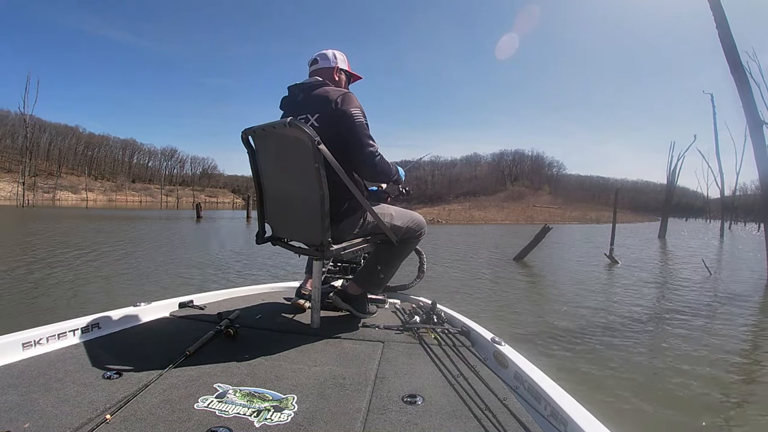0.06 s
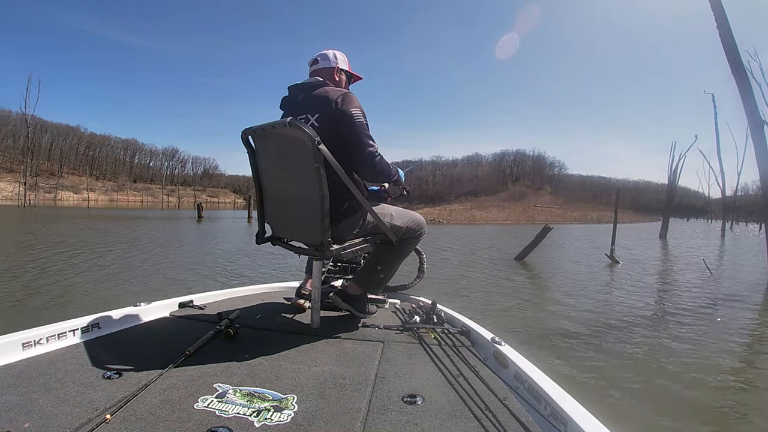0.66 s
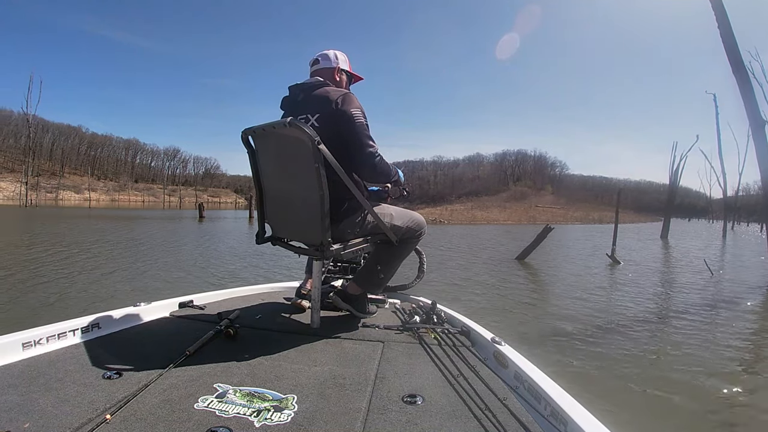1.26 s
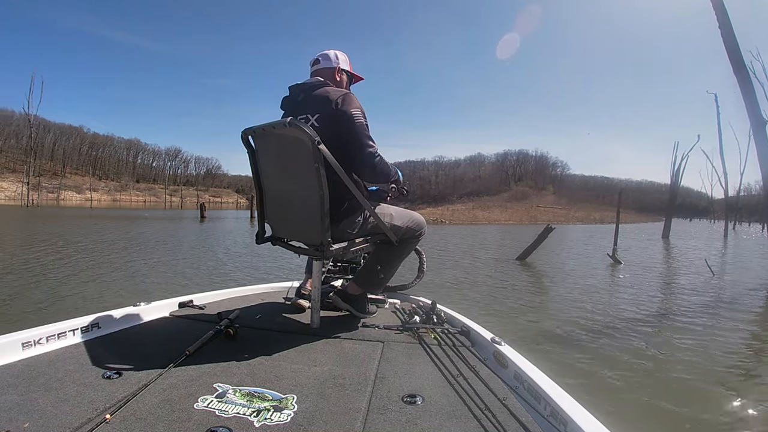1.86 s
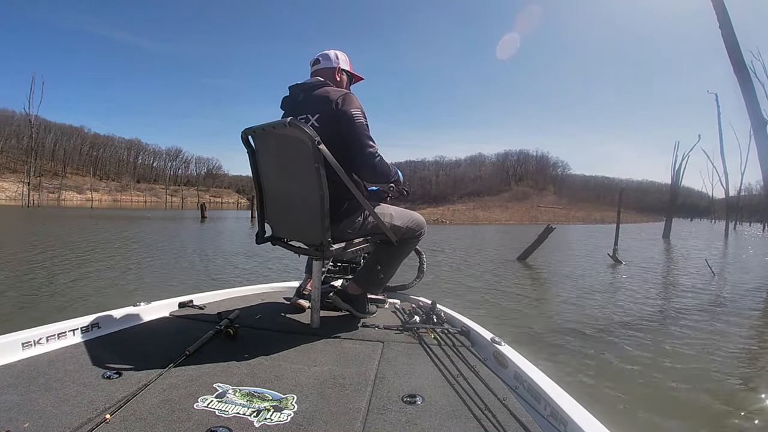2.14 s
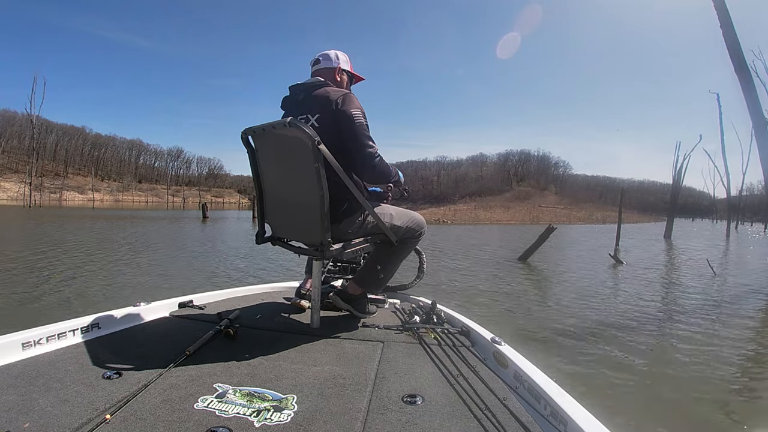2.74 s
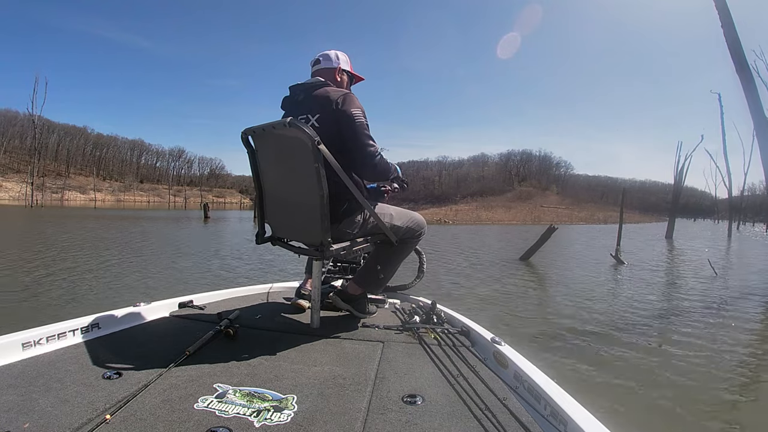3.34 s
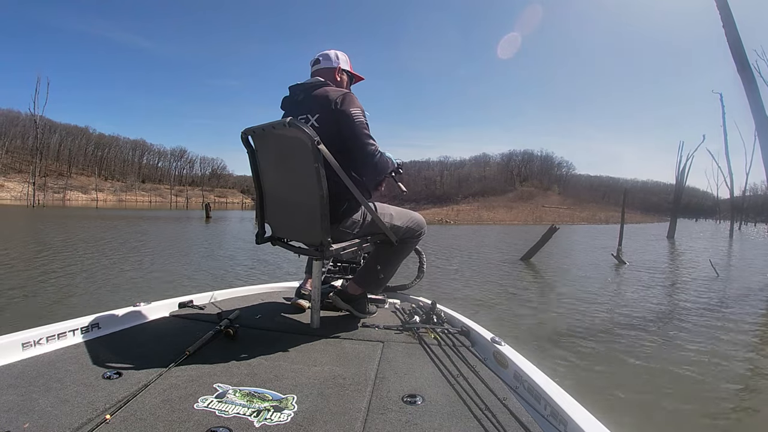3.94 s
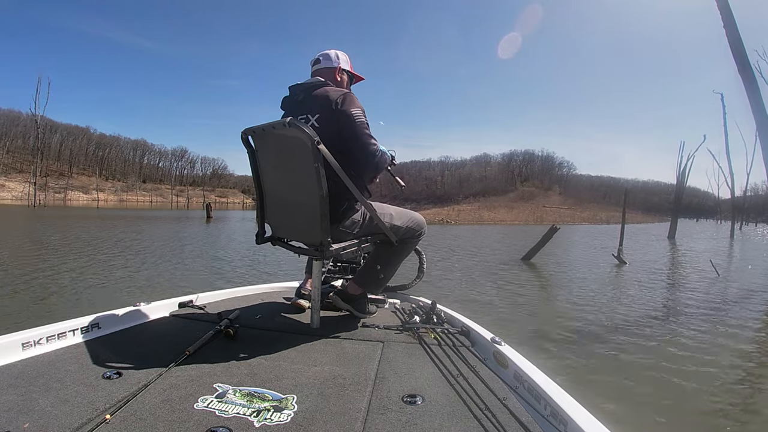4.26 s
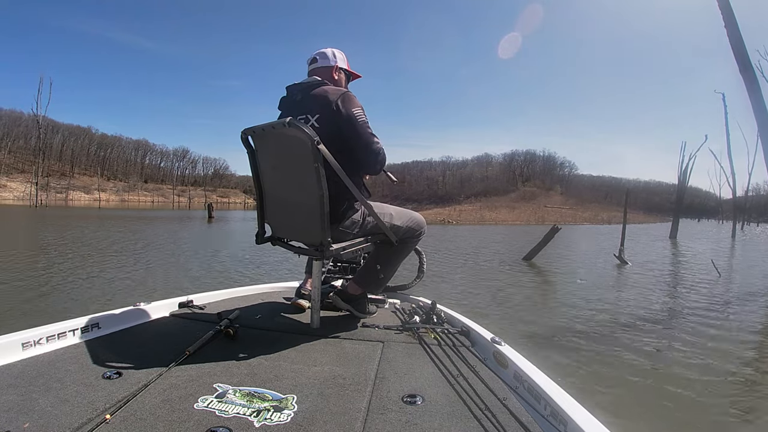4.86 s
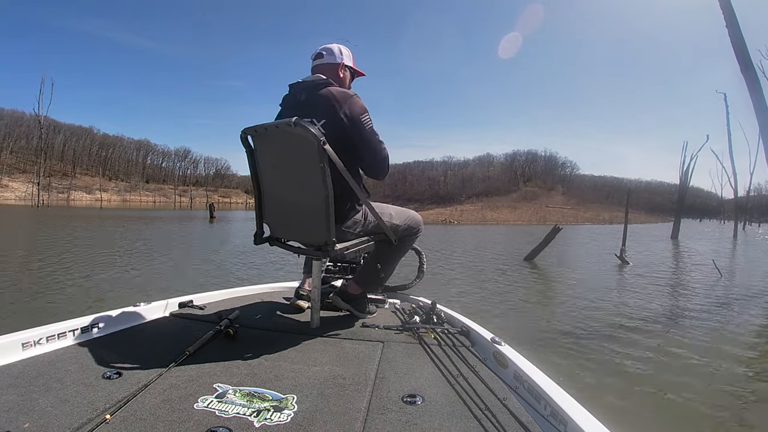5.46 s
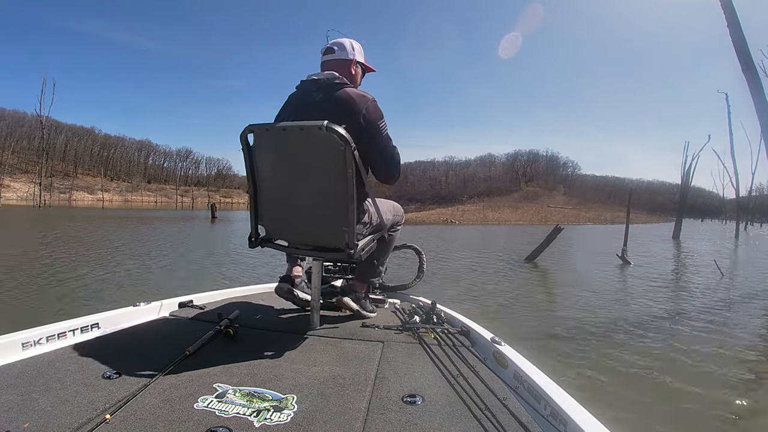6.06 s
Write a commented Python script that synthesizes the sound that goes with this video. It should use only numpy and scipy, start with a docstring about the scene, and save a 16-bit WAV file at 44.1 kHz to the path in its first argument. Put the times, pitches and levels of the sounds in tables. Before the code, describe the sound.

On a lake, an electric trolling motor hums unevenly through a fishing boat while light wind rumbles on the microphone. Wavelets slap the hollow hull, with one stronger knock midway, followed by small splashes, light tackle clicks and a jacket's rustle. Swallows twitter overhead, busier in the second half, and other birds whistle faintly from shore. Near the end the swivel seat gives a quick run of loud cracks, heard close from the deck.

```python
"""On a lake in light wind, an electric trolling motor hums through the hull of a fishing boat.
Wavelets slap the hollow hull, wash along it and splash in small bubbles. The angler's tackle clicks,
his line hisses, his jacket rustles, and his pedestal seat sticks and slips in loud cracks as he
swivels. Swallows twitter overhead in quick falling sweeps; other birds whistle from the shore."""
import sys
import numpy as np
from scipy import signal
from scipy.fft import rfft, irfft, next_fast_len
from scipy.io import wavfile
from scipy.ndimage import map_coordinates

SR = 44100
rng = np.random.default_rng(int(sys.argv[2]) if len(sys.argv) > 2 else 0)


def wav_record(signal):
    """Record a signal, one row per channel, as 16-bit PCM in the file named by sys.argv[1]."""
    frames = np.transpose(np.atleast_2d(signal))
    bounded = np.clip(frames, -1, 1)
    # unit amplitude maps onto the largest positive 16-bit level
    quanta = np.round(bounded * 32767).astype(np.int16)
    wavfile.write(sys.argv[1], SR, quanta)


N = 272979
T = np.arange(N) / SR

# water washing along the hull: time_s, level_db
WASH_LEVEL = [(0.0, -56), (0.22, -59), (2.28, -55.5), (3.17, -52.5), (4.29, -58), (4.82, -56.5),
              (5.36, -61), (5.7, -60.5)]
# colour of ripples and spray: freq_hz, level_db
RIPPLE_SPECTRUM = [(400, -10), (800, -2), (1200, 11), (1900, 9), (2800, -1.5), (5000, -3.5), (10000, -24),
                   (14000, -75)]
# a swallow's falling sweep: pitch_ratio
SWALLOW_SWEEP = [1.2, 1.1, .93, .72]


def motor(waver=0.0018, tick_db=-59, tick_hz=7000, tick_width_hz=1100, tick_scatter_turns=0.102):
    """Multiples of the shaft rate sound through the hull, with a faint tick about once a turn."""
    # propeller shaft speed: time_s, turns_per_s
    shaft_speed = [(0, 25.7), (2, 25.8), (2.9, 26.1), (3.6, 25.9), (4.3, 26.6)]
    # strength of the hum: time_s, level_db
    hum_level = [(0.0, -48), (0.22, -65.5), (0.73, -44), (1.24, -40), (1.32, -54), (1.48, -41), (2.2, -43),
                 (2.32, -62.5), (2.46, -44), (2.86, -39.5), (3.68, -47.5), (3.79, -38), (4.54, -48),
                 (4.67, -64), (4.7, -51.5), (5.08, -47.5), (5.33, -64), (5.7, -64)]
    # hull panels buzz more in a strong wash: shaft_multiple, over_mean_wash_db, db_per_wash_db
    panels = [(7, 1, 2), (9, -5, 2.06)]
    turns = np.cumsum(curve(shaft_speed) * (1 + waver * wobble(21))) / SR
    partial = lambda multiple: np.sqrt(2) * np.sin(2 * np.pi * (multiple * turns + rng.random()))
    hum = amp(curve(hum_level)) * partial(6)
    wash_db = curve(WASH_LEVEL)
    buzz = np.zeros(N)
    for multiple, db, growth in panels:
        panel_db = wash_db.mean() + db + growth * (wash_db - wash_db.mean())
        buzz += amp(panel_db + 4.8 * wobble(6)) * partial(multiple)
    within_turn = (turns + tick_scatter_turns * wobble(25)) % 1
    tick_gate = np.exp(-((within_turn - .5) / 0.021) ** 2)
    return hum + buzz + amp(tick_db) * tick_gate * hollow(tick_hz, tick_width_hz)


def seat(ring_db=-9, burst_db=-8, wave_db=-5, frame_db=-19, base_db=-21.5, detune=0.03):
    """The swivel sticks and slips: each slip snaps, rings the post and frame and clunks the base plate."""
    # slips of the swivel: start_s, level_db
    slips = [(5.7975, -14.5), (5.8322, -7), (5.8467, -9), (5.8795, -7), (5.8889, -8.5), (5.8973, -12),
             (5.918, -8)]
    # modes of the seat post: pitch_hz, level_db, t60_s
    post_modes = [(1706, 1, 0.039), (2644, 3.5, 0.032), (3410, -9.5, 0.028), (4380, -12.5, .04),
                  (5540, -7.5, 0.046), (6640, -19, 0.048), (9100, -19, 0.04)]
    # colour of a snap: freq_hz, level_db
    snap_spectrum = [(900, -16), (1450, -2.5), (2100, -11), (2700, -2.5), (3700, -11), (4700, -16.5),
                     (5300, -6.5), (7000, -17.5), (9300, -18.5), (11000, -29), (15000, -53)]
    out, t = np.zeros(N), np.arange(SR // 8) / SR
    frame = amp(frame_db) * fade(t, 0.061, 0.001) * noise(snap_spectrum, len(t))
    for start, db in slips:
        burst = amp(burst_db) * fade(t, 0.014, 0.00033) * noise(snap_spectrum, len(t))
        # the load on the post shifts from slip to slip, and its modes with it
        ring = np.zeros(len(t))
        for (hz, mode_db, t60), (size, shift) in zip(post_modes, rng.standard_normal((len(post_modes), 2))):
            mode = np.sin(2 * np.pi * (hz * (1 + detune * shift) * t + rng.random()))
            ring += amp(mode_db + ring_db + 2 * size) * fade(t, t60, 0.00066) * mode
        clunk = amp(base_db) * fade(t, 0.1, 0.00068) * hollow(800, 800, len(t))
        add(out, start, amp(db) * (burst + ring + frame + clunk))
        # the bending wave arrives treble first
        wave_hz = 2700 * np.exp(detune * rng.standard_normal())
        add(out, start, amp(db + wave_db) * glide(0.003215, wave_hz, [1.6, 1, .6]))
    return out


def hull(boom_hz=183, deck_hz=123, pocket_db=-3.5, glug_db=-31):
    """Blows ring the hollow hull, its panel and the air trapped under it; one pocket glugs and gurgles."""
    # wavelets slapping the hull: start_s, level_db, t60_s, boom_db, pocket_hz
    slaps = [(.819, -35, 0.24, -29, 740), (1.742, -31.5, 0.19, -24, 573), (2.995, -19, 0.16, -31.5, 840),
             (5.833, -23, 0.15, -43, 845), (5.881, -26, 0.2, -51, 676), (5.959, -32.5, 0.16, -34, 665),
             (6.112, -31, 0.15, -33.5, 865)]
    # colour of the hull: freq_hz, level_db
    hull_spectrum = [(60, -12), (122, -19.5), (150, -12.5), (220, 1.5), (275, -8.5), (340, 3), (410, -8),
                     (490, -5.5), (600, -5), (810, -10), (1000, -20.5), (1400, -27.5), (3000, -35.5),
                     (8000, -61)]
    # weight shifting on the deck: start_s, level_db
    thuds = [(3.001, -27.5), (5.835, -24.5), (5.889, -20.5), (6.112, -28)]
    out, t = np.zeros(N), np.arange(SR // 2) / SR
    for start, db, t60, boom_db, pocket_hz in slaps:
        pocket = amp(pocket_db) * hollow(pocket_hz, 130, len(t))
        attack_s = 0.0021 * amp(-27 - db)  # the harder the blow, the quicker it rises
        add(out, start, amp(db - 1) * fade(t, t60, attack_s) * (noise(hull_spectrum, len(t)) + pocket))
        add(out, start, amp(boom_db) * fade(t, 0.3, 0.0022) * np.sin(2 * np.pi * boom_hz * t))
    for start, db in thuds:
        add(out, start, amp(db) * fade(t, 0.26, 0.0037) * np.sin(2 * np.pi * deck_hz * t))
    add(out, 3.195, amp(glug_db) * glide(0.0586, 301, [1.3, 1.02, .7], taper=1))
    gurgle = swells([(3.28, 0.09, .2, -55)]) * hollow(442, 160)
    return out + gurgle


def splashes(rise_per_s=3, spray_db=-10, bubble_t60=0.02, spray_t60=0.038):
    """Each splash is three small bubbles, rising in pitch, with a puff of spray."""
    # little splashes: start_s, level_db, pitch_hz
    plips = [(3.525, -30, 1695), (3.53, -32.5, 805), (3.649, -26.5, 1780), (3.666, -27.5, 1460),
             (3.69, -38, 2460), (4.913, -36, 860), (4.947, -31.5, 1800), (4.959, -33, 1530),
             (5.094, -38, 874), (5.098, -32, 1780), (5.353, -36, 930), (6.113, -35, 840)]
    out, t = np.zeros(N), np.arange(SR // 25) / SR
    for start, db, hz in plips:
        spray = fade(t, spray_t60, 0.00031) * noise(RIPPLE_SPECTRUM, len(t))
        add(out, start, amp(db + spray_db) * spray)
        for k, (pitch, delay) in enumerate(rng.standard_normal((3, 2))):
            phase = 2 * np.pi * hz * np.exp(.06 * pitch) * t * (1 + rise_per_s * t)
            bubble = fade(t, bubble_t60, 0.00049) * np.sin(phase)
            add(out, start + 0.016 * k * abs(delay), amp(db - 5.4 * k) * bubble)
    return out


def tackle(click_t60=0.012, width_ratio=0.34, cutoff_hz=8500):
    """Rod and reel click dryly: short bursts of noise, each through one broad resonance."""
    # light clicks: start_s, level_db, centre_hz
    clicks = [(.543, -40, 6000), (.917, -42, 4230), (0.963, -40, 6000), (2.074, -40.5, 5600),
              (2.089, -36, 2200), (2.134, -42, 5600), (2.995, -31.5, 3940), (3.0054, -32, 4840),
              (3.025, -35.5, 7200), (4.569, -41.5, 3540), (4.585, -39, 1930), (4.965, -35, 5500),
              (5.738, -32, 4400)]
    out, t = np.zeros(N), np.arange(SR // 30) / SR
    for start, db, centre in clicks:
        burst = rng.standard_normal(len(t)) * fade(t, click_t60, .0001)
        body = lambda hz: resonance(hz, centre, width_ratio * centre) / (1 + (hz / cutoff_hz) ** 10)
        click = filtered(burst, body)
        add(out, start, amp(db + 4.5) * click / np.abs(click).max())
    return out


def jacket(rub_db=-1, grain_db=6, bands=10):
    """Stiff cloth rubs in tiny crinkles, each at its own pitch."""
    # arm movements: peak_s, rise_s, fall_s, level_db
    rubs = [(3.53, 0.017, 0.22, -48.5), (3.67, 0.015, 0.027, -44.5), (4.59, 0.11, 0.042, -53),
            (4.96, 0.035, 0.26, -48), (5.3, 0.44, 0.36, -51.5), (5.75, 0.087, 0.3, -52.5),
            (6.16, 0.025, .15, -63)]
    # colour of the cloth: freq_hz, level_db
    cloth_spectrum = [(600, -12), (1500, 1.5), (2800, 10), (4500, 4), (6300, 5), (8000, -7), (10000, -18),
                      (13000, -38), (16000, -44)]
    cloth = noise(cloth_spectrum)
    log_centres, step = np.linspace(np.log(800), np.log(12000), bands, retstep=True)
    crinkles = np.zeros(N)
    for centre in log_centres:
        band = filtered(cloth, lambda hz: np.maximum(1 - np.abs(np.log(hz + 1) - centre) / step, 0))
        crinkles += band * amp(grain_db * wobble(260))
    return amp(rub_db) * swells(rubs) * unit(crinkles)


def fishing_line():
    """Line hisses briefly through the rod guides."""
    # pulls on the line: peak_s, rise_s, fall_s, level_db
    pulls = [(3.5, 0.02, 0.011, -50), (3.59, 0.051, 0.013, -54), (3.67, 0.0055, 0.0095, -46)]
    # colour of the hiss: freq_hz, level_db
    hiss_spectrum = [(3000, -2), (6000, 10), (9000, 1.5), (11000, -10), (14000, -19), (15500, -24)]
    return swells(pulls) * noise(hiss_spectrum)


def twitters(sweep_s=0.0118, echo_db=-10, sink=0.084, zigzag=0.031, swell_db=4):
    """Swallows sing runs of curved falling sweeps, by turns higher and lower."""
    # runs of sweeps: start_s, sweep_count, spacing_s, centre_hz, level_db
    runs = [(.02, 3, .014, 4900, -50), (0.105, 4, 0.011, 4830, -48.5), (.4, 4, 0.015, 5050, -48),
            (.476, 5, 0.0095, 5000, -45), (.555, 4, .012, 4900, -45.5), (1.099, 4, 0.017, 4750, -47.5),
            (1.179, 5, 0.0084, 4760, -43), (1.728, 3, 0.01, 5220, -47.5), (1.795, 4, .011, 4800, -44),
            (3.711, 3, 0.015, 5200, -47), (3.831, 4, .012, 4900, -46), (3.912, 2, 0.0096, 5200, -39),
            (3.974, 4, 0.0092, 4830, -40), (4.12, 5, .008, 4600, -39), (4.199, 4, 0.0079, 4890, -39),
            (4.407, 3, .012, 5320, -39), (4.472, 4, .011, 4940, -42), (4.568, 3, 0.0096, 4800, -44.5),
            (4.922, 4, 0.0094, 4870, -37.5), (4.995, 5, 0.0088, 4810, -35.5), (5.403, 3, 0.018, 4780, -45),
            (5.469, 4, 0.011, 4510, -41.5), (5.569, 4, .009, 4560, -43.5), (5.649, 5, 0.011, 4480, -43.5),
            (6.014, 3, .011, 5600, -53)]
    out = np.zeros(N)
    for start, count, spacing, hz, db in runs:
        for k, (late, pitch, scatter_db, bend) in enumerate(rng.standard_normal((count, 4))):
            # through a run the sweeps sink and fall further; the later middle ones are loudest
            progress = k / (count - 1)
            centre = hz * np.exp(0.025 * pitch + zigzag * (-1) ** k - sink * (progress - .5))
            contour = np.power(SWALLOW_SWEEP, .55 + .25 * progress + .2 * np.tanh(bend))
            level_db = db + swell_db * (np.sin(2 * np.pi * progress / 3) - 1) + scatter_db
            sweep = amp(level_db) * glide(sweep_s, centre, contour, taper=0.75)
            add(out, start, sweep)
            add(out, start + 0.0057, amp(echo_db) * sweep)  # mirrored by the water
            start += spacing * np.exp(0.08 * late)
    return out


def near_calls():
    """Between the runs come arched notes, dipping notes, a quick rising chirp and buzzy warbles."""
    # calls: start_s, length_s, pitch_hz, level_db
    arches = [(3.62, 0.011, 4540, -44.5), (3.693, .013, 4360, -45), (3.886, 0.013, 4630, -37),
              (3.958, 0.013, 4160, -36), (4.182, .018, 4100, -36.5), (4.455, .017, 4480, -42),
              (4.985, 0.0093, 4030, -38.5), (5.7, 0.011, 5200, -36)]
    dips = [(1.143, .038, 3900, -50.5), (1.749, 0.044, 4140, -42.5)]
    warbles = [(2.915, 0.092, 5420, -58), (3.04, 0.094, 4930, -54), (3.195, 0.096, 4920, -51),
               (3.36, 0.11, 4660, -48.5)]
    # their contours: pitch_ratio
    dip_contour = [1.18, .96, .96, 1.04, 1.02]
    warble_contour = [1.07, 1.12, 1.04, .95, .91, .96, 1.06, 1.07, 0.81, 0.83]
    return (notes(arches, [.82, .98, 1, .89])
            + notes(dips, dip_contour)
            + notes([(5.743, 0.0112, 4670, -35.5)], [.82, 1, 1.08])
            + notes(warbles, warble_contour, trill=0.059))


def flock(start_s=3.45, chirp_db=-53, chirp_s=0.0109, chirp_hz=4900, spread=0.174, count=190):
    """More swallows come within earshot: faint scattered chirps."""
    out = np.zeros(N)
    for when, (pitch, slide, size) in zip(rng.random(count), rng.standard_normal((count, 3))):
        hz = chirp_hz * np.exp(spread * min(pitch, 1))
        chirp = glide(chirp_s, hz, np.power(SWALLOW_SWEEP, slide / 2), taper=1)
        add(out, start_s + when * (N / SR - start_s), amp(chirp_db + 4 * min(size, 2)) * chirp)
    return out


def shore_birds():
    """Far voices give scooping whistles, arching whistles and one quavering call."""
    # whistles: start_s, length_s, pitch_hz, level_db
    scoops = [(1.858, 0.11, 3440, -52.5), (2.238, .108, 3410, -55), (2.624, 0.083, 3340, -58),
              (3.035, 0.098, 3310, -54)]
    arches = [(1.28, 0.13, 3320, -69), (4.32, 0.21, 2334, -58), (4.68, 0.18, 2130, -62.5),
              (4.89, 0.21, 2440, -56.5), (5.12, .3, 2250, -61.5)]
    # the scoop's contour: pitch_ratio
    scoop_contour = [1.2, 1.15, 1.02, .9, .77, .85, 1.2]
    # the voice weakens at the bottom of the scoop: level_db
    scoop_loudness = [3, -1, -7, -14, 14]
    quaver_contour = [1.06, 1.12, 0.7, 0.98, .92, 1.01, .97, 0.92]
    return (notes(scoops, scoop_contour, scoop_loudness)
            + notes(arches, [.94, .96, 1, 1.03, .98, .87], loudness_db=[6, 1, -2])
            + notes([(1.425, 0.14, 4010, -54)], quaver_contour, loudness_db=[-14, -1.5, 4.5]))


def birds(near_send_db=-10, far_send_db=-3, scatter_t60=0.27, flutter_db=2.5):
    """All the voices flutter in level; the trees scatter the far ones most."""
    near = twitters() + flock() + near_calls()
    flutter = amp(flutter_db * wobble(150))
    near, far = flutter * near, flutter * shore_birds()
    t = np.arange(SR // 4) / SR
    tail = rng.standard_normal(len(t)) * fade(t, scatter_t60, 0.004)
    send = amp(near_send_db) * near + amp(far_send_db) * far
    return near + far + signal.fftconvolve(send, tail / np.linalg.norm(tail))[:N]


def water(bubbling_db=4):
    """Water surges slowly along the hull while two sets of ripples sparkle independently."""
    # the rocking boat pushes water aside, wavelets pass the bow: crest_s, rise_s, fall_s, level_db
    rocking = [(3.33, 0.25, 1, -58.5), (4.96, 0.058, 0.097, -45.5), (5.85, 0.066, 0.1, -37.5),
               (6.17, 0.046, .1, -37)]
    wavelets = [(.22, 0.28, 0.38, -58.5), (1.43, 0.13, .25, -61), (1.86, 0.32, 0.52, -61),
                (3.35, 0.23, 0.16, -67.5), (4.75, 1, 1, -62), (5.86, 0.076, 0.11, -49.5),
                (6.12, 0.0064, 0.11, -47)]
    # colour of the wash: freq_hz, level_db
    wash_spectrum = [(60, -28), (130, 3), (230, 1), (330, -5), (450, -13.5), (580, -27.5), (810, -15.5),
                     (1000, -60), (2000, -62)]
    surge = (amp(curve(WASH_LEVEL) + 1) + swells(rocking)) * noise(wash_spectrum)
    sparkle = unit(sum(amp(bubbling_db * wobble(70)) * noise(RIPPLE_SPECTRUM) for _ in range(2)))
    return surge + swells(wavelets) * sparkle


def wind(flutter_db=2.5):
    """Gusts buffet the microphone with a low, unsteady rumble."""
    # gust strength: time_s, level_db
    gusts = [(0.0, -44.5), (0.31, -44.5), (0.38, -34), (0.65, -41), (1.12, -35), (1.91, -49), (3.21, -48.5),
             (3.24, -42), (3.52, -54.5), (4.05, -47), (4.09, -55.5), (5.76, -37.5), (5.77, -33),
             (6.19, -36)]
    # colour of the rumble: freq_hz, level_db
    buffet_spectrum = [(10, -10.5), (22, 0), (35, -4), (55, -11), (80, -17), (120, -24), (200, -27),
                       (400, -85)]
    return amp(curve(gusts) + flutter_db * wobble(22)) * noise(buffet_spectrum)


def air(level_db=-61):
    """An even hiss lies over the lake."""
    # colour of the hiss: freq_hz, level_db
    air_spectrum = [(400, 5), (800, 20), (1200, 8.5), (2000, 11.5), (3500, 8.5), (5000, 7.5), (7000, 5),
                    (8500, -2.5), (11000, -9.5), (13000, -18), (15800, -22)]
    return amp(level_db) * noise(air_spectrum)


def amp(db):
    """Decibels to gain."""
    return 10 ** (np.asarray(db) / 20)


def unit(x):
    """Scale to rms 1."""
    return x / np.sqrt(np.mean(x ** 2) + 1e-20)


def curve(points):
    """One value per sample along (time_s, value) points."""
    return np.interp(T, *np.transpose(points))


def wobble(rate):
    """A smooth random curve, rate knots a second."""
    return map_coordinates(rng.standard_normal(int(N * rate / SR) + 4), [T * rate])


def swells(rows, span_db=10):
    """Gain of (peak_s, rise_s, fall_s, level_db) swells; rise and fall each cover span_db."""
    power = sum(amp(db - span_db * np.maximum((peak - T) / rise, (T - peak) / fall)) ** 2
                for peak, rise, fall, db in rows)
    return np.sqrt(power)


def fade(t, t60, attack_s):
    """Envelope of a blow."""
    return amp(-60 * t / t60) * (1 - np.exp(-t / attack_s))


def filtered(x, response):
    """Filter x by a response of frequency."""
    size = next_fast_len(len(x) + 8192)
    return irfft(rfft(x, size) * response(np.fft.rfftfreq(size, 1 / SR)), size)[:len(x)]


def noise(spectrum, size=N):
    """Noise of rms 1 coloured by (freq_hz, level_db) points."""
    freqs, db = np.transpose(spectrum)
    colour = lambda hz: amp(np.interp(np.log(hz + 1), np.log(freqs), db))
    return unit(filtered(rng.standard_normal(size), colour))


def resonance(hz, centre_hz, width_hz):
    """Causal response of one mode."""
    return 1j * hz * width_hz / (centre_hz ** 2 - hz ** 2 + 1j * hz * width_hz)


def hollow(centre_hz, width_hz, size=N):
    """Noise of rms 1 in one steep resonance."""
    return unit(filtered(rng.standard_normal(size), lambda hz: resonance(hz, centre_hz, width_hz) ** 2))


def glide(length_s, hz, contour, taper=0.33, trill=0, trill_hz=170):
    """A pure note that follows a contour of pitch ratios, with an optional fast trill in its middle."""
    size = int(length_s * SR)
    position = np.linspace(0, len(contour) - 1, size)
    pitch = hz * map_coordinates(np.array(contour, float), [position], mode="nearest")
    pitch *= 1 + trill * np.hanning(size) * np.sin(2 * np.pi * trill_hz * np.arange(size) / SR)
    return signal.windows.tukey(size, taper) * np.sin(2 * np.pi * np.cumsum(pitch) / SR)


def notes(rows, contour, loudness_db=(0, 0), trill=0):
    """Play (start_s, length_s, pitch_hz, level_db) notes that share pitch and loudness contours."""
    out = np.zeros(N)
    for start, length, hz, db in rows:
        note = glide(length, hz, contour, trill=trill)
        position = np.linspace(0, len(loudness_db) - 1, len(note))
        shape_db = np.interp(position, np.arange(len(loudness_db)), loudness_db)
        add(out, start, amp(db + shape_db) * note)
    return out


def add(track, start_s, sound):
    """Mix a sound into the track."""
    room = track[max(0, round(start_s * SR)):][:len(sound)]
    room += sound[:len(room)]


def scene():
    """Everything heard from the deck behind the seat, in mono."""
    bed = motor() + wind() + water() + air()
    return (bed + hull() + splashes() + seat() + tackle() + jacket() + fishing_line() + birds())[None]


def record(dry, ceiling=.55, top_hz=15750):
    """The camera rounds off the highest peaks and keeps nothing above its band limit."""
    rounded = dry / (1 + (dry / ceiling) ** 4) ** .25
    return np.array([filtered(channel, lambda hz: hz < top_hz) for channel in rounded])


dry = scene()
out = record(dry)
wav_record(out)
```